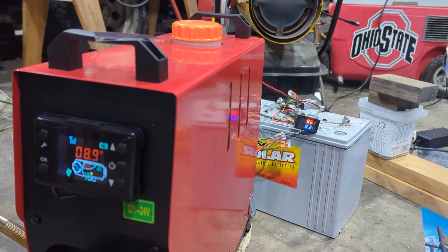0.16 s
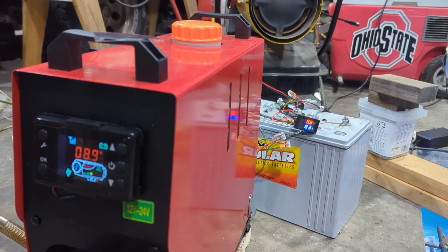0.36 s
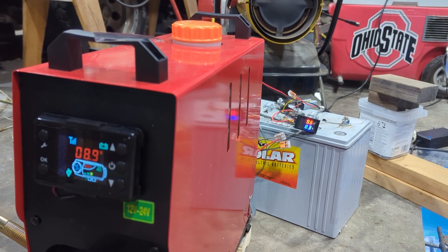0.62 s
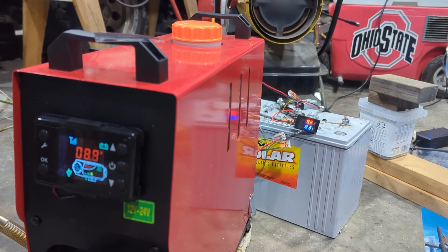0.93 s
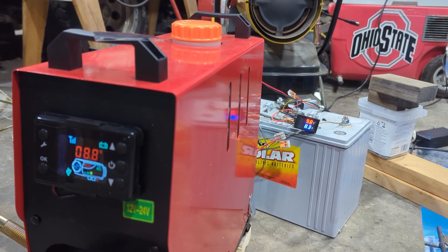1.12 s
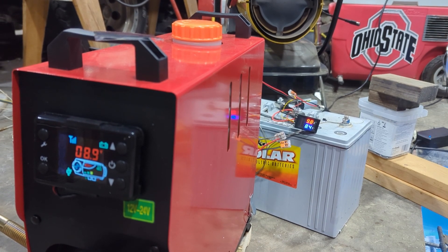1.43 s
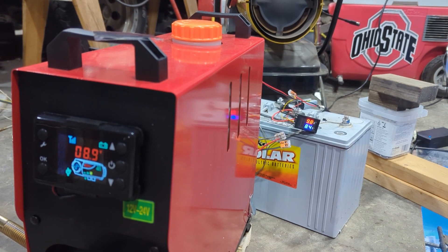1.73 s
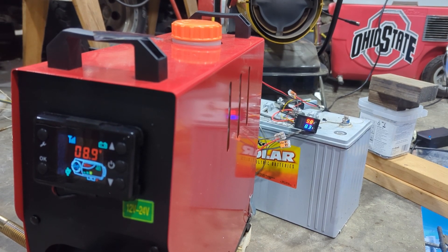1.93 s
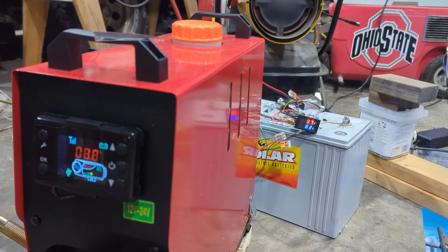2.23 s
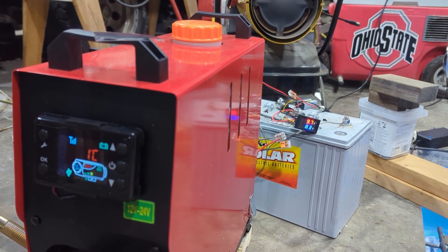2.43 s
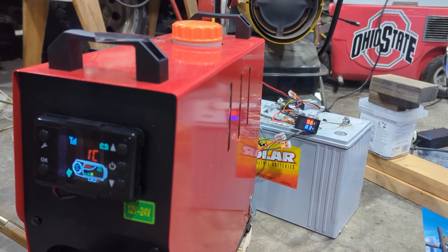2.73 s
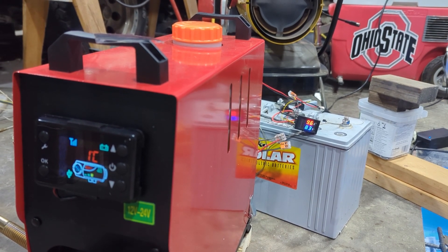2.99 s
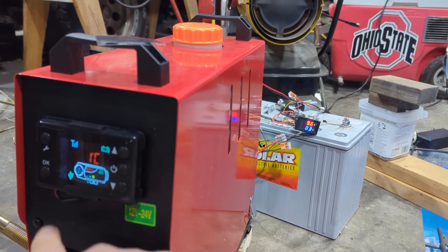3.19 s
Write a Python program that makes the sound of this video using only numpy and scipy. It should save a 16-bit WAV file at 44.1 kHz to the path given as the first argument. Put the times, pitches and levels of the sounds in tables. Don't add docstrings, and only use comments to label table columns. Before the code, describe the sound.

A small diesel heater's fuel pump makes sharp metallic tick-knock pairs, a little over two per second, over a constant low blower rumble; near the end a hand faintly brushes the case. Garage, close stereo phone.

```python
import sys
import numpy as np
from scipy import signal
from scipy.fft import rfft, irfft, next_fast_len
from scipy.io import wavfile
from scipy.ndimage import uniform_filter1d

SR = 44100
rng = np.random.default_rng(int(sys.argv[2]) if len(sys.argv) > 2 else 0)


def transcribe(signal):
    frames = np.atleast_2d(signal).T
    limited = np.clip(frames, -1, 1)
    pcm = np.round(limited * 32767).astype(np.int16)
    wavfile.write(sys.argv[1], SR, pcm)


def nominal_scale(level):
    x = np.asarray(level, float) / 20
    return 10 ** x


N = 147735


def curve(table, hz):
    p = np.array(table, float)
    return np.interp(np.log(hz + 1), np.log(p[:, 0]), p[:, 1])


def shape(x, gain):
    n = next_fast_len(x.shape[-1], True)
    hz = np.arange(n // 2 + 1) * SR / n
    return irfft(rfft(x, n) * gain(hz), n)[..., :x.shape[-1]]


# frequency_hz, coherence (0-1)
LIKENESS = [(220, 1), (330, 0.84), (700, 0.73), (1300, 0.52), (2500, 0.37), (5000, 0.4), (7000, 0),
            (11000, 0.1)]


def ports(size):
    left, other = rng.standard_normal((2, size))

    def like(hz):
        return np.clip(curve(LIKENESS, hz), 0, 1)

    right = shape(left, like) + shape(other, lambda hz: np.sqrt(1 - like(hz) ** 2))
    return np.array([left, right])


def walk(rate_hz):
    k = int(SR / rate_hz)
    steps = np.repeat(rng.standard_normal(N // k + 1), k)
    wander = uniform_filter1d(uniform_filter1d(steps, k), k)[:N]
    return wander / wander.std()


# frequency_hz, level_db (per Hz)
AIR = [(28, -99.5), (55, -56.5), (150, -56), (330, -67.5), (900, -83.5), (1600, -90.5), (5000, -95),
       (5800, -102)]
# frequency_hz, level_db (per Hz)
HISS = [(4000, -110), (6000, -104), (9100, -108), (9400, -134), (10100, -130), (11800, -115), (12700, -121),
        (14800, -123)]
# frequency_hz, width_hz, level_db (per Hz)
DUCTS = [(62, 12, -54.5), (310, 46, -67), (131.6, 42, -50), (210, 47, -62), (454.3, 44, -63.5),
         (489, 253, -70), (1058.5, 70, -70.5), (1195.4, 116, -70), (1915, 130, -88.5), (2640, 790, -90),
         (3365, 620, -86.5)]
# frequency_hz, width_hz, level_db (per Hz)
WHINE = [(1983, 28, -79), (3640, 11, -77.5), (3966, 74, -85), (4450, 60, -82.5), (4930, 57, -84),
         (5430, 30, -101), (5960, 15, -97), (6620, 24, -89), (7100, 30, -94.5), (8030, 30, -96.5)]


def blower_spectrum(hz):
    steep_fall_db = 27.4 * (hz > 6000) * np.log2(hz / 6000 + 1e-9)
    power = nominal_scale(curve(AIR, hz) - steep_fall_db) ** 2
    power = power + nominal_scale(curve(HISS, hz)) ** 2 * (hz > 3000)
    for peak_hz, width_hz, level_db in DUCTS + WHINE:
        power = power + nominal_scale(level_db) ** 2 / (1 + (2 * (hz - peak_hz) / width_hz) ** 2) ** 2
    return np.sqrt(power)


def blower():
    level_db, swell_db, flicker_db = 42, 0.28, -1
    air = shape(ports(N + SR), blower_spectrum)[:, SR // 2:SR // 2 + N]
    edge = N // 8
    air = np.pad(air, ((0, 0), (edge, edge)), mode="reflect")
    swell, out = walk(0.93), 0
    for octave in range(10):
        def share(hz):
            octaves_up = np.clip(np.log2((hz + 1) / 32), 0, 9)
            return np.clip(1 - abs(octaves_up - octave), 0, 1)

        band = shape(air, share)[:, edge:edge + N]
        out = out + band * nominal_scale(swell_db * swell + flicker_db * walk(9.41))
    return out * nominal_scale(level_db)


T = np.arange(8192) / SR
TOUCH_EARLY_S = 0.0033


def fall(t60_s):
    return np.exp(-np.log(1000) * T / t60_s)


def push(contact_s):
    return np.sin(np.pi / 2 * np.clip(T / contact_s, 0, 1)) ** 2


def build_up():
    return 1 - np.exp(-T / 0.0063)


def first_touch(level_db):
    return nominal_scale(level_db) * build_up() * fall(.03) * np.sin(2 * np.pi * 4450 * T)


# frequency_hz, level_db
SNAP = [(900, -20), (1500, -9), (3300, -12), (4400, 2), (5300, -6.5), (5700, -11.5), (9200, -19.5),
        (9800, -37)]


def metal_snap(contact_s):
    return shape(ports(len(T)) * fall(0.023) * push(contact_s), lambda hz: nominal_scale(curve(SNAP, hz)))


# frequency_hz, knock_db, tick_db, t60_s
CASE = [(506.4, 0, -0.5, 0.034), (548, -7, 3, 0.039), (682.6, -4, 1.5, 0.042), (821, -16, -24.5, 0.076),
        (1146, -10, -8.5, 0.054), (1426, -13, -6.5, 0.053), (1652, -10, -7, 0.044), (1927, -32, -23, 0.064),
        (2176, -18, -16, 0.075), (2306, -19, -17, 0.12), (2570, -21, -14.5, 0.069),
        (2725, -25, -18.5, 0.28), (3002, -20.5, -13, 0.16), (3330, -25, -17.5, 0.12)]
# frequency_hz, knock_db, tick_db, t60_s
BODY = [(3600, -20, -26.5, 0.065), (3460, -14, -29, 0.017), (3617, -10, -7, 0.027), (3885, -6, -11, 0.051),
        (4250, -3, -9, 0.026), (4520, -13, -27, 0.038), (4670, -11, -17, 0.045), (4860, -10, -20, 0.03),
        (5080, -12, -17, 0.016), (5270, -11, -13, 0.036), (3710, -12, -17.5, 0.018), (3970, -12, -4, 0.041),
        (4420, -11, -7.5, 0.021)]
# frequency_hz, knock_db, tick_db, t60_s
LID = [(1295, -28, -13, 0.033), (1715, -27, -12, 0.1), (2050, -26.5, -17, 0.059),
       (2357, -28.5, -24.5, 0.18), (2493, -23, -14, 0.17), (2676, -22, -13.5, 0.1), (2910, -20, -11.5, .15),
       (2930, -21.5, -22.5, .12), (3107, -19.5, -20, 0.15), (3290, -26, -36, 0.069), (3510, -20, -21, .1)]


def ringing_modes(column, contact_s):
    in_step_hz = 1500
    modes = np.array(CASE + BODY + LID)
    hz, level_db, t60_s = (modes[:, k, None, None] for k in (0, column, 3))
    start = 2 * np.pi * rng.random((len(hz), 2, 1))
    start[:, 0] *= np.clip(hz[:, 0] / in_step_hz, 0, 1) ** 2
    start[:, 1] = start[:, 0] + start[:, 1] * (1 - curve(LIKENESS, hz[:, 0])) ** 2
    rings = nominal_scale(level_db) * fall(t60_s) * np.sin(2 * np.pi * hz * T + start)
    return push(contact_s) * rings.sum(axis=0)


# frequency_hz, level_db
RATTLE = [(300, -12), (480, 8), (900, -9), (3300, -8.5), (5300, -20.5), (5800, -29.5), (9200, -37),
          (9800, -62)]


def case_rattle():
    noise = shape(ports(len(T)), lambda hz: nominal_scale(curve(RATTLE, hz)))
    decay = fall(0.0071) + nominal_scale(-7.5) * fall(0.21)
    grain = nominal_scale(1.5 * walk(400)[:len(T)])
    return noise / noise[0].std() * decay * build_up() * grain


def fizz():
    centre_hz, width_hz = 11100, 2000
    noise = ports(len(T)) * fall(0.46) * build_up()
    return shape(noise, lambda hz: 1 / (1 + (2 * (hz - centre_hz) / width_hz) ** 4))


def wall_echo(ring):
    delay_s, dull_hz = .0235, 800
    return shape(ring, lambda hz: np.exp(-2j * np.pi * hz * delay_s) / (1 + (hz / dull_hz) ** 2))


def bass_late(x):
    late_s, below_hz = .0016, 900
    return shape(x, lambda hz: np.exp(-2j * np.pi * hz * late_s / (1 + (hz / below_hz) ** 4)))


def blow(column, contact_s, rattle_db, snap_db, touch_db):
    ring = ringing_modes(column, contact_s)
    main = ring + nominal_scale(-1.5) * wall_echo(ring)
    main = main + nominal_scale(rattle_db) * case_rattle()
    main = main + nominal_scale(snap_db) * metal_snap(contact_s)
    main = bass_late(main + nominal_scale(-41.5) * fizz())
    return np.roll(main, int(TOUCH_EARLY_S * SR), axis=1) + first_touch(touch_db)


def tick():
    return nominal_scale(3.5) * blow(column=2, contact_s=0.0025, rattle_db=3.5, snap_db=2.5, touch_db=-22)


def knock():
    return nominal_scale(7.5) * blow(column=1, contact_s=0.0036, rattle_db=-4.5, snap_db=2, touch_db=-13)


# start_s, level_db
TICKS = [
    (-.096, -41),
    (.3515, -38.5),
    (.7958, -39),
    (1.2352, -39),
    (1.6663, -40),
    (2.0915, -39.5),
    (2.5107, -39),
    (2.9235, -39),
    (3.3358, -40.5),
]
# start_s, level_db
KNOCKS = [
    (-.0395, -31),
    (.4082, -29),
    (.8528, -29.5),
    (1.2921, -29.5),
    (1.7234, -29.5),
    (2.1485, -30),
    (2.5671, -29.5),
    (2.9802, -29.5),
]
# frequency_hz, level_db
PUMP_RIGHT = [(700, 2.5), (2000, -1.5), (3000, 1), (4300, 2.5), (4700, 5.5), (5100, 4.5), (5500, 2.5),
              (8000, 3)]


def pump():
    scatter = .27
    pad = SR // 2
    out = np.zeros((2, N + 2 * SR))
    for table, make, spread in ((TICKS, tick, 2 * scatter), (KNOCKS, knock, scatter)):
        usual = make()
        odd = (make() - make()) / np.sqrt(2)
        other = (make() - make()) / np.sqrt(2)
        shares = spread * rng.standard_normal((len(table), 2))
        for (start_s, level_db), (a, b) in zip(table, shares):
            i = pad + int((start_s - TOUCH_EARLY_S) * SR)
            stroke = (usual + a * odd + b * other) / np.sqrt(1 + a * a + b * b)
            out[:, i:i + usual.shape[1]] += nominal_scale(level_db) * stroke
    right = shape(out[1], lambda hz: nominal_scale(curve(PUMP_RIGHT, hz)))
    return np.array([out[0], right])[:, pad:pad + N]


# start_s, length_s, level_db
BRUSH = [
    (3.087, 0.027, -46.5),
    (3.138, 0.051, -47.5),
    (3.173, 0.033, -47),
    (3.191, 0.039, -44.5),
]
# centre_s, level_db
CATCHES = [(3.098, -44), (3.104, -53), (3.115, -44.5), (3.153, -44), (3.166, -52), (3.176, -48),
           (3.185, -42), (3.204, -47), (3.211, -48), (3.217, -42), (3.228, -44)]


def hand():
    catch_s, centre_hz, width_hz = 0.00063, 3450, 2200
    t = np.arange(N) / SR
    strokes = sum(nominal_scale(level_db) * np.sin(np.pi * np.clip((t - start_s) / length_s, 0, 1))
                  for start_s, length_s, level_db in BRUSH)
    catches = sum(nominal_scale(level_db) * np.exp(-((t - centre_s) / catch_s) ** 2)
                  for centre_s, level_db in CATCHES)
    press = nominal_scale(-3.5) * strokes + catches
    grain = ports(N) * nominal_scale(2.5 * walk(250))
    return shape(grain / grain.std() * press,
                 lambda hz: 4 / (1 + (2 * (hz - centre_hz) / width_hz) ** 2) ** 2)


def scene():
    return blower() + pump() + hand()


def roll_off(x):
    return signal.sosfilt(signal.butter(12, 15250, fs=SR, output="sos"), x)


# frequency_hz, level_db
SHADOW = [(200, -0.64), (300, 3), (470, -3.5), (800, -0.5), (1900, 0.5), (2800, -12.5), (4800, -14.5),
          (6300, 0)]


def record(dry):
    early_s, lag_fades_hz, top_hz, edge = .000045, 5000, 15250, 2048

    def right_port(hz):
        lead = np.exp(2j * np.pi * hz * early_s / (1 + (hz / lag_fades_hz) ** 4))
        return nominal_scale(curve(SHADOW, hz)) * lead

    dry = np.pad(dry, ((0, 0), (edge, edge)), mode="reflect")
    both = np.array([dry[0], shape(dry[1], right_port)])
    cut = shape(both, lambda hz: 1 / (1 + (hz / top_hz) ** 60))[:, edge:-edge]
    fade_out = np.sin(np.pi / 2 * np.clip(np.arange(N)[::-1] / (.004 * SR), 0, 1)) ** 2
    return roll_off(cut * fade_out)


dry = scene()
out = record(dry)
transcribe(out)
```